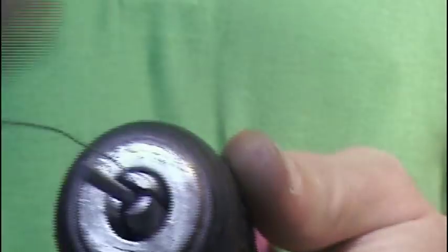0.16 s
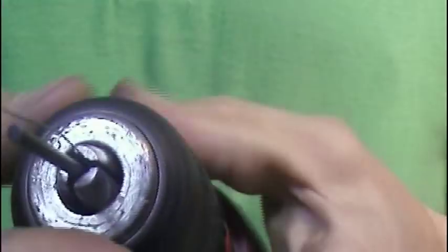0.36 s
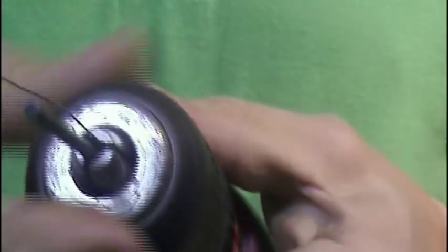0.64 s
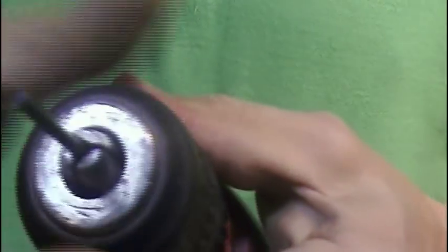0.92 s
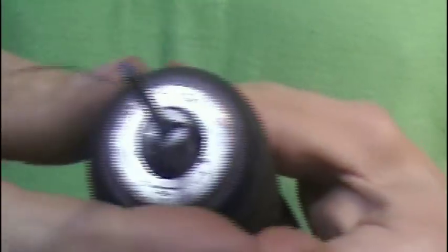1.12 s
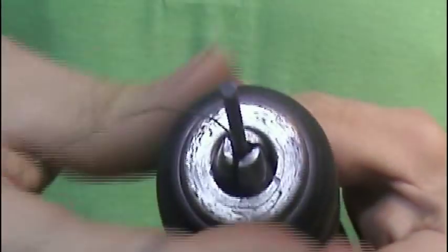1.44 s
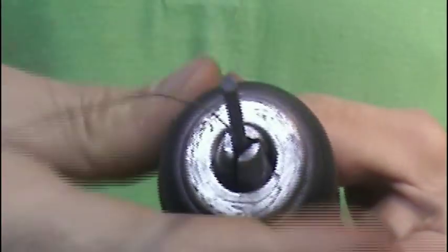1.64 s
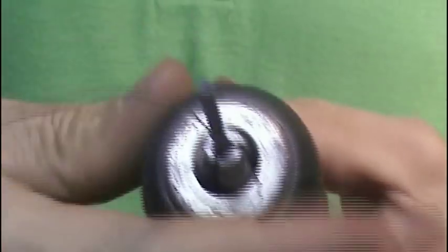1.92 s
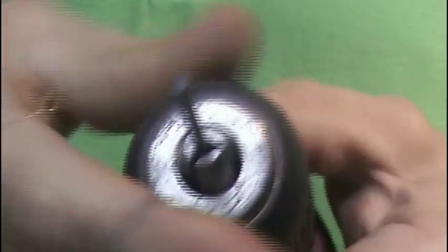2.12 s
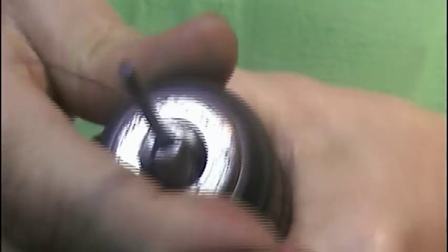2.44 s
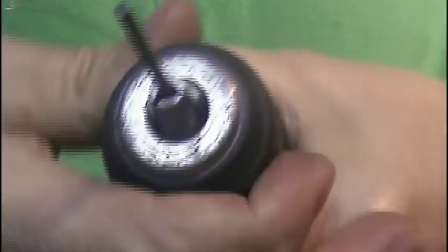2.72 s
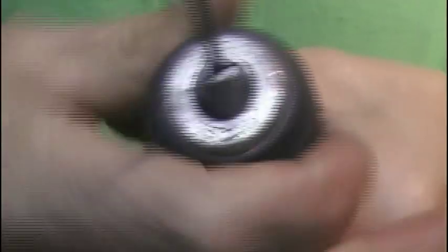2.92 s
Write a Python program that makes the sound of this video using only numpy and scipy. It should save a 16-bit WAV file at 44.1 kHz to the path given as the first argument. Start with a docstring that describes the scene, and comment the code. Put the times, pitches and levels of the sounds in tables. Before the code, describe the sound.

Close ratchety clicks and metallic scrapes of a hand-turned drill chuck over low rumble and hiss

```python
"""Rumble, hiss and the faint rub of skin on a knurl run throughout as hands hold a keyless drill chuck close by.
From 0.22 s they twist its sleeve: soft thuds jolt the drill, and jaws and ratchet click in short rattling bursts
that ring the modes of sleeve and steel. Dense tiny slips and noise make the sleeve scrape under the twists.
A hard click at 2.43 s leads into mostly sparser ones to the end at 3.1 s; a small damped room answers throughout."""
import sys
import numpy as np
from scipy import signal
from scipy.fft import rfft, irfft, next_fast_len
from scipy.io import wavfile
from scipy.ndimage import uniform_filter1d

SR = 44100
rng = np.random.default_rng(int(sys.argv[2]) if len(sys.argv) > 2 else 0)


def linear_from_db(decibels):
    """Turn decibels (scalar or array-like) into linear amplitude factors; 0 gives 1."""
    return 10 ** (np.asarray(decibels, float) / 20)


def unload_audio(sound):
    """Save the sound as a 16-bit wav file, at the path given as the first command line argument."""
    columns = np.transpose(np.atleast_2d(sound))
    # keep every value between -1 and 1, then stretch to whole-number steps
    steps = np.round(np.clip(columns, -1, 1) * 32767)
    wavfile.write(sys.argv[1], SR, steps.astype(np.int16))


N = 136710

# Rumble and hiss. Each row: frequency in Hz, relative density in dB per Hz.
AIR_SPECTRUM = [(12, -57), (20, 1), (53, -0.5), (81, -3), (138, -12.5), (301, -15), (328, -16), (624, -22),
                (1530, -27.5), (5850, -29), (6910, -33.5), (16000, -49.5)]
# Likeness of that air on both sides. Each row: frequency in Hz, left-right likeness from 0 to 1.
AIR_LIKENESS = [(40, 0.37), (180, 0.18), (1600, 0.18), (10000, 0.072)]
# Lean of the air to one side. Each row: frequency in Hz, left over right in dB.
AIR_LEAN = [(30, 5.5), (80, 2), (300, 0.7)]
# Skin on the knurl. Each row: time in seconds, relative level of the grit in dB, level of its airy hiss in dB.
SKIN_RUB = [(0.0, -70, -68), (0.26, -62.5, -63), (0.4, -60, -60), (0.5, -41.5, -57), (0.59, -62, -66),
            (0.82, -62, -63), (0.93, -57, -65), (1.05, -65, -64), (1.27, -69, -67.5), (1.39, -76, -64),
            (1.47, -54.5, -60), (1.81, -55.5, -59), (1.9, -49.5, -62), (2.04, -53, -60),
            (2.26, -56.5, -59.5), (2.66, -57.5, -61.5), (2.81, -58.5, -65), (3.1, -61, -58.5)]
# Scrapes of the turning sleeve. Each row: start in seconds, length in seconds, relative level in dB,
# brightness (extra steel and hiss) in dB.
SLEEVE_SCRAPES = [(0.224, 0.028, -41, 13), (0.345, 0.011, -71, 25.5), (0.431, 0.057, -41.5, -5),
                  (0.621, 0.075, -51, 5), (0.672, 0.044, -37.5, -2.5), (0.826, 0.046, -47.5, -6),
                  (0.873, 0.035, -30.5, -19), (1.058, 0.026, -59, 7), (1.23, 0.015, -46.5, 5.5),
                  (1.255, 0.047, -54, 9), (1.313, 0.003, -44.5, -4), (1.34, 0.013, -46, -10),
                  (1.413, .035, -43.5, 10), (1.47, 0.053, -44.5, 3), (1.564, 0.04, -59, -13),
                  (1.729, 0.071, -41, 1), (1.878, 0.033, -44.5, 9), (1.979, 0.026, -49.5, 12),
                  (2.01, 0.063, -37.5, 6), (2.167, 0.029, -69, 17), (2.253, 0.062, -63.5, 20),
                  (2.404, .016, -33.5, 10), (2.427, 0.062, -35.5, 9), (2.514, 0.035, -58, 16.5),
                  (2.626, 0.023, -40.5, -15), (2.723, 0.18, -75.5, 32), (2.806, 0.023, -37, 5.5),
                  (2.901, 0.019, -51, 4), (2.951, 0.044, -55.5, 10), (3.06, 0.12, -62.5, 17)]
# Colour of the scraping and rubbing hiss. Each row: frequency in Hz, relative level in dB.
HISS_COLOUR = [(4000, -18), (6500, -6), (9000, -1), (12500, -8), (16000, -2)]
# Resonances of the sleeve. Each row: frequency in Hz, width in Hz, relative level in dB.
SLEEVE_MODES = [(160, 67, -13.5), (444, 155, -6.5), (900, 465, -3.5), (1320, 401, 0.5), (1702, 520, -0.5),
                (2200, 494, -2)]
# Resonances of the steel. Each row: frequency in Hz, width in Hz, relative level in dB.
STEEL_MODES = [(2900, 490, 7), (3423, 420, 9), (4300, 774, 4.5), (5270, 780, 1), (6020, 300, -1.5),
               (6720, 1050, -8), (6940, 520, -1.5)]
# Treble resonances of a click. Each row: frequency in Hz, width in Hz, relative level in dB.
TREBLE_MODES = [(8300, 200, -3.5), (8180, 2700, 16.5), (11300, 4500, 9), (12200, 1100, 3)]
# Jolts of the drill in the hand. Each row: time in seconds, peak in dB before the common trim.
DRILL_JOLTS = [(0.22, -35), (0.673, -39), (0.811, -54), (1.736, -23), (2.246, -28.5), (2.399, -26.5),
               (2.426, -35), (2.804, -40)]
# Clicks of jaws and ratchet. Each row: time in seconds, level in dB before the common trim, rattle length in ms
# before a small common extension, sleeve pitch under the grip in Hz, steel ring over sleeve in dB,
# steel pitch in Hz, treble over sleeve in dB.
CHUCK_CLICKS = [(0.222, -6, 1.34, 2200, 4.5, 4280, -11), (0.2229, -9, 3.2, 1320, -15, 4500, -44),
                (0.386, -32.5, 1.1, 1910, 0, 3350, -14.5), (0.4138, -34, 4.5, 1340, -7, 4500, -23),
                (0.4321, -23.0, 5.2, 1990, -5, 2720, -22), (0.443, -17.5, 3, 1520, -1.5, 2720, -19),
                (0.4556, -26, 4.1, 1500.0, -8, 3850, -19), (0.4679, -22.5, 7.1, 1460.0, -9.0, 3220, -27.0),
                (0.4794, -24, 2.0, 1500.0, 2, 4000, -28), (0.483, -24, 1.5, 1510, -8.0, 2970, -25.0),
                (0.486, -23.5, 2.6, 2040, -1, 4120, -15), (0.5017, -25, 1, 1520, -18, 3430, -28),
                (0.5101, -22.5, 4.6, 1340, -0.5, 3400, -18), (0.6212, -34.5, 6.7, 800.0, -6, 4570, -23.0),
                (0.629, -41, 3.3, 1360.0, -2, 4590, -12), (0.6474, -23.5, 1.1, 1960, -14, 2780, -28),
                (0.6624, -8, 0.95, 1120, -11, 3360, -28), (0.6727, -14.5, 3.2, 1360.0, -4, 3200, -17),
                (0.6801, -19.0, 6.6, 1120, -4, 3800, -35), (0.6855, -40, 2, 1300.0, -13, 3350, -25.0),
                (0.693, -22.5, 5.2, 2210, -1, 4400, -15), (0.71, -21.0, 5.4, 1080, -10, 3130, -24),
                (0.7212, -19.0, 2.9, 1870, -4.5, 4370, -14), (0.7455, -32.0, 1.0, 1000.0, -10, 4320, -26),
                (0.749, -16, 3.4, 880, -33, 3690, -44), (0.7574, -23.5, 2, 990, -14, 2810, -30),
                (0.812, -13.5, 3.66, 2220, -4.5, 4920, -13), (0.8193, -14, 1.5, 870, -9.5, 3500, -29),
                (0.8617, -34.5, 2.9, 1240, 3.5, 2890, -15), (0.8719, -27, 1.4, 1280, -11.0, 3540, -24.0),
                (0.8775, -19.5, 3.9, 2230, -3, 3760, -30), (0.893, -18.5, 6.0, 2430, -3, 3330, -15),
                (0.9085, -18.5, 6.8, 1580, -2, 3530, -27), (0.9151, -23.5, 1.4, 2020, -1, 2870, -18),
                (0.9216, -19.5, 6.7, 1450, -6.5, 4400, -26.0), (0.9521, -18.5, 9.7, 1120, -19.5, 2980, -34),
                (0.9607, -51, 5.4, 1170, -17, 3370, -25), (1.0073, -38, 3.1, 956, -22, 2810, -19),
                (1.055, -40, 3.9, 900.0, -15, 2860, -19), (1.1574, -34.5, 0.53, 1400, -5.5, 3490, -28),
                (1.2636, -21, 3.3, 1352, -11, 2810, -29.0), (1.2782, -25.5, 1.5, 1020, -20, 2950, -25.0),
                (1.2908, -22, 3.5, 2480, -3.5, 3500, -24.0), (1.3511, -34, 1.9, 920.0, -30, 3070, -33),
                (1.3598, -19, 4.3, 1230, -11.5, 3850, -15), (1.3677, -29.5, 3.6, 1390, -16, 3530, -30),
                (1.4162, -23, 13.5, 895, -6.0, 5350, -17.5), (1.4357, -31, 8.2, 1790, -27, 2860, -10),
                (1.444, -44, 1.3, 1640, -8.0, 3420, -16), (1.5244, -21.0, 1.7, 1530, -6.5, 2970, -28),
                (1.5979, -14.0, 5.2, 1900, -12.5, 3800, -24.5), (1.6531, -34, 1.5, 1220, -23.0, 3200, -30),
                (1.6693, -26.5, 3.3, 900.0, -12, 2810, -29), (1.6841, -32, 2.2, 2160, -2, 5670, -28),
                (1.6963, -27.5, 3, 1280, -2, 3560, -33), (1.7083, -40, 2.8, 850, -21, 3670, -26),
                (1.7364, -15, 4.3, 1440, -1, 3600, -20.5), (1.7571, -13.5, 1.9, 1500, -3, 3440, -25.0),
                (1.7682, -10, 4.9, 1920, -6.5, 3500, -29), (1.7899, -21.5, 0.76, 1420, -1.5, 3180, -20),
                (1.8495, -34.5, 1.2, 1330, -6, 3060, -25.0), (1.8653, -28, 0.5, 1100, -4, 2900, -13.5),
                (1.8815, -30.5, 1.2, 1100, -19, 3120, -28), (1.8955, -29.5, 8, 1800, -5.0, 3330, -18),
                (1.9819, -23.5, 2.04, 1570, -1.5, 3220, -27), (2.015, -32, 6.9, 1460, -12, 2810, -11),
                (2.0295, -33, 5.6, 1260.0, -10.0, 3180, -11), (2.0476, -11, 4.9, 1460, -3, 3450, -32),
                (2.075, -28.0, 15, 1860, 1, 3270, -21), (2.1537, -15, 0.54, 1040, -34, 2850, -52),
                (2.1584, -30.5, 3.5, 1410, -6, 2990, -35), (2.2034, -39, 2, 660, -7, 4340, -15.0),
                (2.2166, -38, 0.8, 1330, -15, 3200, -20), (2.2247, -46, 1.5, 870, 1, 3320, -24),
                (2.2449, -23.5, 3.7, 1040, -13, 3240, -30), (2.292, -41.5, 2.6, 2480, -1.0, 3380, -8),
                (2.3367, -37, 1.4, 1580, -12, 4150, -27), (2.367, -51, 1.9, 2550, 10.5, 2770, -23),
                (2.3993, -34, 1.2, 500.0, 2, 3660, -30.0), (2.4072, -24, 7.8, 1520, -5, 3600, -26),
                (2.4298, -5.5, 1.5, 1417, -1.5, 2600, -13.5), (2.442, -19.5, 5.2, 1470, -10, 3740, -37),
                (2.5752, -27.5, 3.2, 2030, -12, 3730, -16), (2.5809, -19, 1.4, 2100, -10.5, 2900, -40),
                (2.6, -19.5, 1.7, 950, -5, 3000, -22), (2.6164, -34, 0.74, 1015, -9.0, 3180, -27),
                (2.6339, -23.0, 1.05, 1460, -7, 3370, -13), (2.645, -29.0, 3.4, 1705, -8, 2810, -28),
                (2.7095, -26.5, 5.9, 1580, -3.5, 2970, -27), (2.7458, -37, 0.76, 2500, 3, 2810, -14),
                (2.7626, -42.5, 2.7, 2540, 8, 2870, -4), (2.7684, -40.5, 3.2, 2560, 10, 3070, -10),
                (2.811, -12.5, 1.2, 1294, -3, 3920, -43), (2.838, -39.5, 0.91, 2600.0, 0.0, 5600, 0),
                (2.9037, -44, 3.4, 1570, 2, 3070, -27), (2.9393, -40, 3.6, 780, -8, 4600, -23),
                (2.9767, -23.5, 6, 1040, -11.5, 3280, -22), (2.9986, -22, 2.7, 910, -16, 3000, -22.5),
                (3.0443, -41, 2.3, 1290, -24, 3330, -24.5), (3.0532, -38, 0.48, 970, -11, 3750, -26.0),
                (3.06, -37, 4.1, 1540, -32, 4380, -24)]
# Small difference between the two ports. Each row: frequency in Hz, side relative to mid in dB.
PORT_SIDE = [(100, -19), (700, -24), (1500, -27), (4400, -15.5), (8000, -6), (15000, -11)]
# Decay of the room. Each row: frequency in Hz, time to fall 60 dB in seconds.
ROOM_DECAY = [(200, 0.48), (800, 0.093), (2000, .15), (5500, .16), (12000, 0.087)]
# Colour of the room. Each row: frequency in Hz, gain in dB.
ROOM_TONE = [(200, 2), (1000, -4), (2000, -2), (3300, 1), (4500, -4), (7000, 4), (11000, -0.5)]
# Likeness of the room on both sides. Each row: frequency in Hz, left-right likeness from 0 to 1.
ROOM_LIKENESS = [(300, 0.83), (1300, 1), (4400, 0.9), (8000, 0.15)]


def unit(x):
    """Scales to rms 1 along the last axis."""
    return x / np.sqrt(np.mean(np.abs(x) ** 2, axis=-1, keepdims=True) + 1e-20)


def along(points, hz):
    """Reads a curve of (Hz, value) points on a log frequency axis."""
    f, v = np.transpose(points)
    return np.interp(np.log(hz + 1), np.log(f + 1), v)


def filtered(x, response):
    """Passes x through a complex response given as a function of frequency."""
    m = next_fast_len(x.shape[-1] + 8192)  # spare length lets the ringing run out
    spectrum = rfft(x, m) * response(np.fft.rfftfreq(m, 1 / SR))
    return irfft(spectrum, m)[..., :x.shape[-1]]


def peak(f, hz, width_hz):
    """Response of one causal resonance: a damped mass on a spring."""
    damping = 1j * f * width_hz
    return damping / (hz * hz - f * f + damping)


def body(modes, f, scatter_db=0):
    """Sums resonances of alternating sign to mean power 1; scatter_db shifts the level of each."""
    gains = linear_from_db(np.transpose(modes)[2] + scatter_db) * (-1.) ** np.arange(len(modes))
    return unit(gains @ np.array([peak(f, hz, width_hz) for hz, width_hz, _ in modes]))


def causal(gain):
    """Minimum-phase response for rows of gains on an FFT grid, so energy comes as early as it can."""
    cepstrum = irfft(np.log(gain + 1e-6))
    half = cepstrum.shape[-1] // 2
    fold = np.r_[1, 2 * np.ones(half - 1), 1, np.zeros(half - 1)]
    return np.exp(rfft(cepstrum * fold))


def pair(two, likeness):
    """Mixes two unrelated signals into a left and right of a given likeness at each frequency."""
    def mix(hz):
        angle = np.arccos(np.clip(along(likeness, hz), -1, 1)) / 2
        return np.array([np.cos(angle), np.sin(angle)])
    mid, side = filtered(two, mix)
    return np.array([mid + side, mid - side])


def slips(per_s, spread_db, size):
    """Sparse impulses at random instants, with scattered size and sign, as surfaces catch and let go."""
    chance = rng.random(size)
    strength = linear_from_db(spread_db * rng.standard_normal(size))
    sign = np.sign(rng.standard_normal(size))
    return (chance < per_s / SR) * strength * sign


def air():
    """Rumble and microphone hiss: shaped noise, partly shared between left and right."""
    level_db = -50  # rms of the mid
    noise = filtered(rng.standard_normal((2, N)), lambda hz: linear_from_db(along(AIR_SPECTRUM, hz)))
    lean = lambda hz: linear_from_db(along(AIR_LEAN, hz) * [[.5], [-.5]])
    both = filtered(pair(noise, AIR_LIKENESS), lean)
    return linear_from_db(level_db) * both / np.sqrt(np.mean(both.mean(0) ** 2))


def rub_and_scrapes():
    """Skin rubs on and the sleeve scrapes: dense slips ring sleeve and steel under a layer of hiss."""
    rise_s, fall_s = .003, 0.01  # linear rise; time constant of the fall
    slips_per_s, slip_spread_db = 2000, 4
    steel_db, hiss_db = -12, -23
    t = np.arange(N) / SR
    start, length, db, bright_db = np.transpose(SLEEVE_SCRAPES)[:, :, None]
    rise = np.clip((t - start) / rise_s, 0, 1)
    strokes = linear_from_db(db) * rise * np.exp(-np.maximum(t - start - length, 0) / fall_s)
    scrape = strokes.sum(0)
    bright_scrape = (strokes * linear_from_db(bright_db)).sum(0)
    at, rub_db, airy_db = np.transpose(SKIN_RUB)
    rub, airy = linear_from_db(np.interp(t, at, rub_db)), linear_from_db(np.interp(t, at, airy_db))

    hiss = unit(filtered(rng.standard_normal(N), lambda hz: linear_from_db(along(HISS_COLOUR, hz))))
    hiss = hiss * (airy + linear_from_db(hiss_db) * bright_scrape)
    grit = unit(slips(slips_per_s, slip_spread_db, size=N) + 0.58 * rng.standard_normal(N))
    # the grit's level wanders by 5.1 dB rms, within milliseconds
    grit = grit * linear_from_db(5.1 * unit(uniform_filter1d(rng.standard_normal(N), size=200)))
    low = filtered(grit * (scrape + rub), lambda f: body(SLEEVE_MODES, f))
    upper = filtered(grit * (bright_scrape + rub), lambda f: linear_from_db(steel_db) * body(STEEL_MODES, f))
    return hiss + low + upper


def thuds():
    """Low soft pushes of the drill's mass: impulses through the same damped resonance twice."""
    hz, width_hz, trim_db = 157, 310, -8
    s, db = np.transpose(DRILL_JOLTS)
    push = lambda f: peak(f, hz, width_hz) ** 2
    one = filtered(np.eye(1, N)[0], push)  # a single push, to scale by its peak
    at = np.round(s * SR).astype(int)
    blows = np.bincount(at, linear_from_db(db + trim_db), N) / np.abs(one).max()
    return filtered(blows, push)


def rattles(length_ms, t_ms, f, lead):
    """Spectra of short knock trains: a first knock and random ones after it that sag and die away."""
    knocks_per_ms, spread_db, first_db = 2.3, 6.5, 6
    sag_db, fall_ms, onset_ms = 5.5, 1, 0.82  # loss along the rattle; time constants after and before it
    knocks = slips(knocks_per_ms * 1000, spread_db, size=(len(length_ms), len(t_ms)))
    knocks[:, 0] = linear_from_db(first_db)
    fall = np.exp(-np.maximum(t_ms - length_ms, 0) / fall_ms)
    knocks = rfft(knocks * linear_from_db(-sag_db * t_ms / length_ms) * fall)
    # even out the broad colour
    knocks = knocks / np.sqrt(uniform_filter1d(np.abs(knocks) ** 2, size=13) + 1e-9)
    # shift later to make way for the onset
    knocks = irfft(knocks * np.exp(-2j * np.pi * f * lead / SR))
    return rfft(knocks * np.exp(np.minimum(t_ms - t_ms[lead], 0) / onset_ms))


def clicks():
    """Jaws and ratchet: each rattle of knocks rings sleeve, steel and treble modes, every click its own mix."""
    grip_width_hz, grip_db = 462, -7.5  # the grip's own resonance over the sleeve's
    ping_width_hz, ping_db = 650, -11  # the struck part's own ring over the steel's
    scatter_db, trim_db = 2.5, -2
    s, db, ms, grip_hz, steel_db, ping_hz, treble_db = np.transpose(CHUCK_CLICKS)[:, :, None]
    n, lead = 2048, 128  # samples in a click, and those before its first knock
    t_ms, f = np.arange(n) / SR * 1000, np.fft.rfftfreq(n, 1 / SR)
    knocks = rattles(np.abs(ms) + .1, t_ms, f, lead)

    def mix(modes):
        scatter = scatter_db * rng.standard_normal((len(s), len(modes)))
        return np.abs(body(modes, f, scatter))

    def bump(hz, width_hz, lift_db):
        return 1 + linear_from_db(lift_db) * unit(np.abs(peak(f, hz, width_hz)) ** 2)

    def ring(gain):
        wave = irfft(knocks * causal(gain))
        loudest = uniform_filter1d(wave ** 2, size=70).max(axis=1, keepdims=True)
        return wave / np.sqrt(loudest)  # loudest short-time rms is 1

    sleeve = ring(mix(SLEEVE_MODES) * bump(grip_hz, grip_width_hz, grip_db))
    steel = ring(mix(STEEL_MODES) * bump(ping_hz, ping_width_hz, ping_db))
    treble = ring(mix(TREBLE_MODES))
    wave = linear_from_db(db + trim_db) * (sleeve + linear_from_db(steel_db) * steel + linear_from_db(treble_db) * treble)
    at = np.round(s * SR).astype(int) + np.arange(n) - lead
    return np.bincount(at.ravel(), wave.ravel(), N + n)[:N]


def tail(t60s, seconds):
    """Two noise tails of energy 1; each frequency dies at its own speed."""
    hz, t, z = signal.stft(rng.standard_normal((2, int(seconds * SR))), SR, nperseg=128)
    decay = linear_from_db(-60 * t / along(t60s, hz)[:, None])
    w = signal.istft(z * decay, SR, nperseg=128)[1]
    return w / np.linalg.norm(w, axis=1, keepdims=True)


def spread(x, t60s, seconds, lag_s=0):
    """Sends x through two noise tails, drawn anew every tenth of a second so that no single draw colours the whole."""
    wet, step, lag = np.zeros((2, N + SR)), SR // 10, int(lag_s * SR)
    for a in range(0, N, step):
        piece = signal.fftconvolve(x[None, a:a + step], tail(t60s, seconds), axes=1)
        wet[:, a + lag:a + lag + piece.shape[1]] += piece
    return wet[:, :N]


def ports(chuck):
    """The chuck straight ahead at two ports: a briefly smeared copy is added left, subtracted right."""
    smear = spread(chuck, [(1000, 0.0072)], .02)[0]  # falls 60 dB in 7.2 ms
    side = filtered(smear, lambda hz: linear_from_db(along(PORT_SIDE, hz)))
    return np.array([chuck + side, chuck - side])


def room(chuck):
    """The answer of walls and bench: short, coloured noise tails that start 3 ms late."""
    level_db, delay_s = -12, .003
    wet = spread(chuck, ROOM_DECAY, .25, delay_s)
    wet = filtered(wet, lambda hz: linear_from_db(along(ROOM_TONE, hz)))
    return linear_from_db(level_db) * pair(wet, ROOM_LIKENESS)


def scene():
    """The chuck at the two ports, in its room, over rumble and hiss."""
    chuck = clicks() + rub_and_scrapes() + thuds()
    return ports(chuck) + room(chuck) + air()


def low_pass(x):
    """Removes everything above the highest recorded frequency."""
    return signal.sosfilt(signal.butter(12, 16180, fs=SR, output="sos"), x)


def record(dry):
    """Hard ceiling, then a steep treble roll-off and a second ceiling."""
    roll_hz, roll_order = 12000, 11
    roll_off = lambda hz: (1 + (hz / roll_hz) ** (2 * roll_order)) ** -.5
    soft = filtered(np.clip(dry, -1, 1), roll_off)
    return low_pass(np.clip(soft, -1, 1))


dry = scene()
out = record(dry)
unload_audio(out)
```